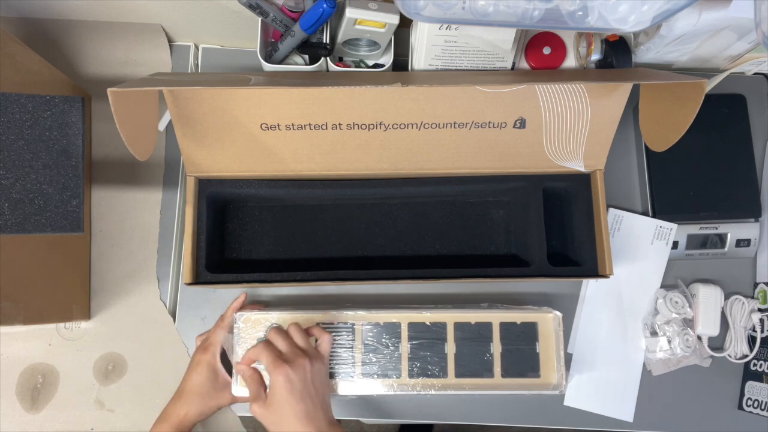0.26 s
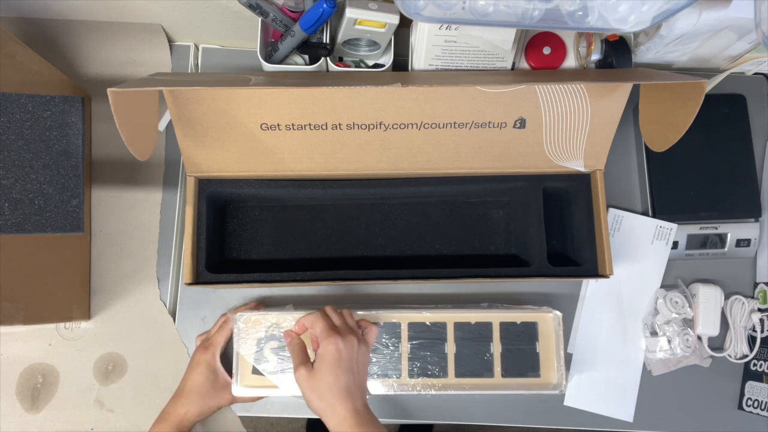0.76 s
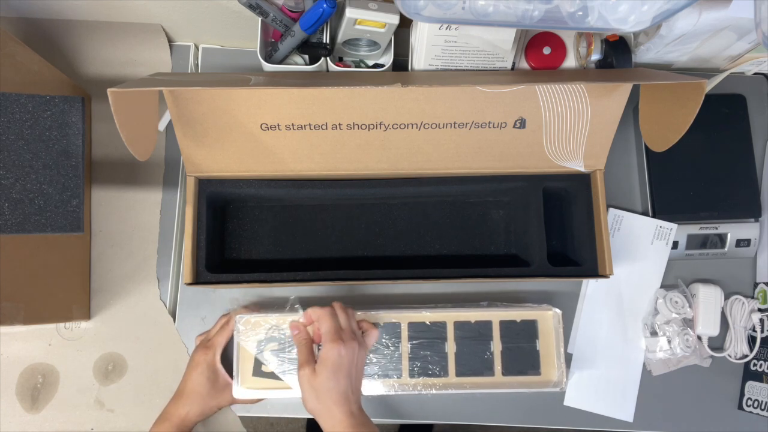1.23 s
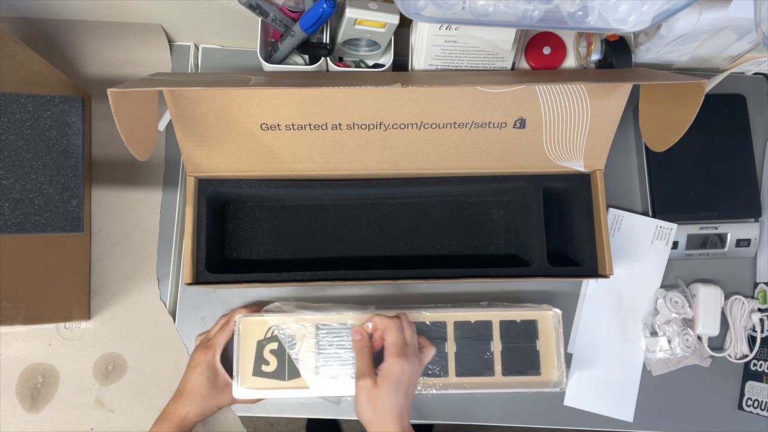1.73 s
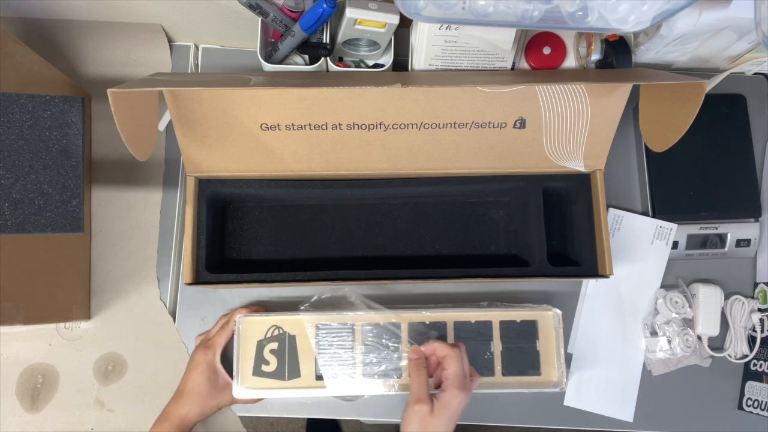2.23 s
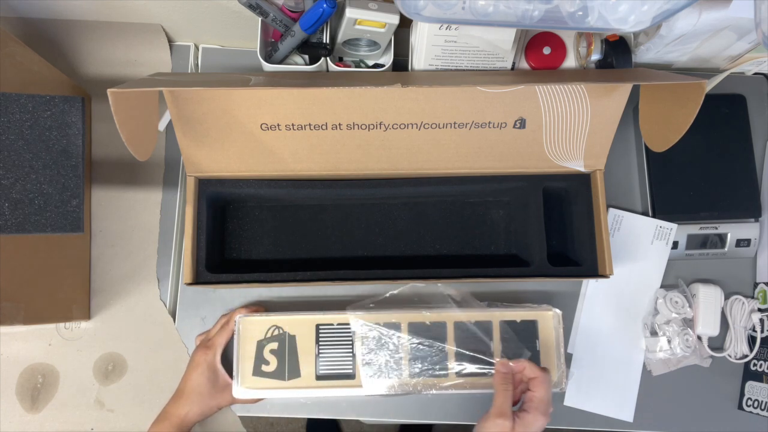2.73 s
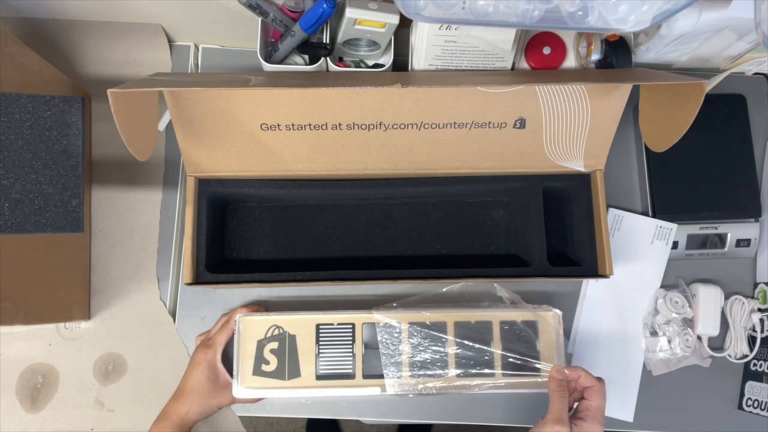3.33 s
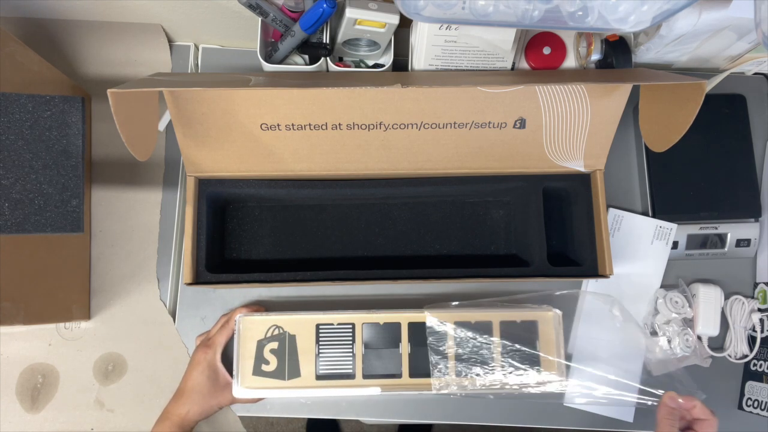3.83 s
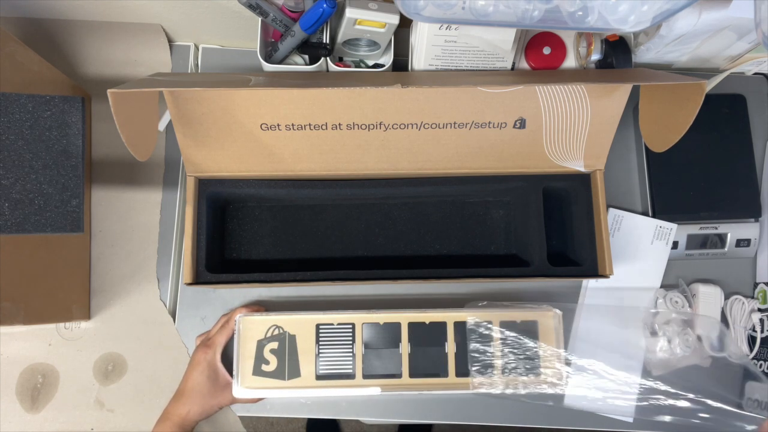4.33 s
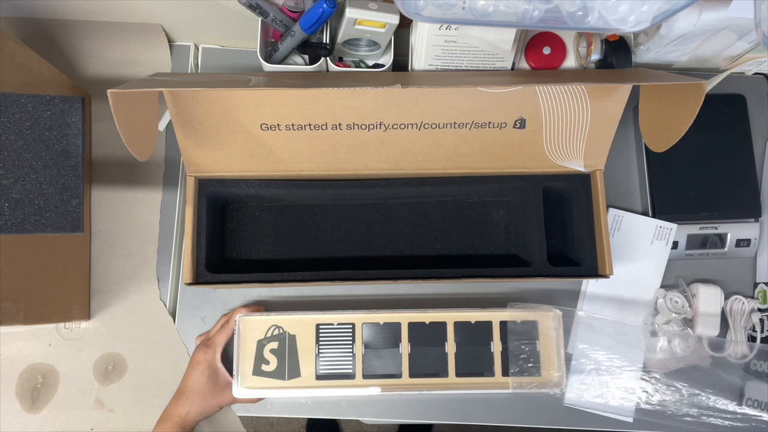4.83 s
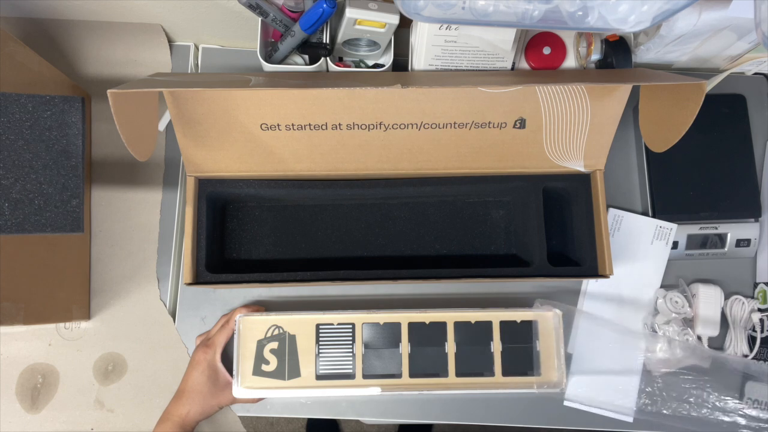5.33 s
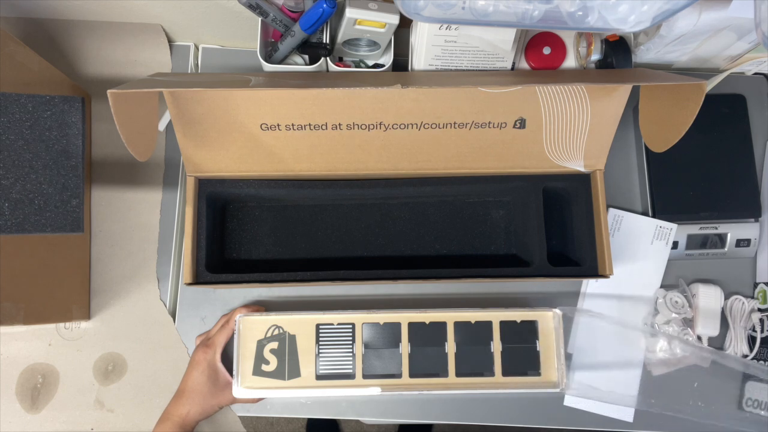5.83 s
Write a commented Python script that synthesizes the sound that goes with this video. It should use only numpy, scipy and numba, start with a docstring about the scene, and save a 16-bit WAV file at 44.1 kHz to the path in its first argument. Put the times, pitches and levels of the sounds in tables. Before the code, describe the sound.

A hand strips clinging plastic film from a rigid panel. First come faint, broken crackles, ticks and tiny pops, then gritty tearing rasps in separate tugs, a near-silent pause, and a sustained, loud, bright ripping hiss with a papery, hollow ring, ending in a sharp crinkle. The panel occasionally bumps the desk softly. Near microphone overhead, short room reflections, quiet low rumble throughout.

```python
"""Protective film pulled in tugs off a plastic panel on a desk, under an overhead two-port microphone in a small room.
A short tug with crinkles and pops opens on the left, then weak tugs to 1.2 s, firmer ones to 3 s and a brief lull.
From 3.3 s long hard pulls move right until a last crinkle near 6 s; soft desk knocks recur and the room hums throughout.
The glue lets go in tiny random snaps that ring the freed sheet, the panel, its rim and the hollow beneath.
The echo off an open carton sweeps with the peel line: its detour shrinks from about 2.5 m to 1.1 m by 1.5 s."""
import sys
import numpy as np
from scipy import signal
from scipy.fft import rfft, irfft
from scipy.io import wavfile
from scipy.ndimage import map_coordinates
from numba import njit

SR = 44100
rng = np.random.default_rng(int(sys.argv[2]) if len(sys.argv) > 2 else 0)


def materialize(psi):
    """Save the field psi as 16-bit PCM at rate SR to the path in sys.argv[1].

    A 1-D psi becomes a single channel; in a 2-D psi each row is a channel.
    """
    bounded = np.clip(np.atleast_2d(psi).T, -1, 1)
    quanta = np.round(bounded * 32767).astype(np.int16)
    wavfile.write(sys.argv[1], SR, quanta)


N = 267687
T = np.arange(N) / SR

# Tugs of the hand: (start [s], attack [s], end [s], relative pull [dB], sag while held [dB/s],
# relative ring of the freed sheet [dB])
HAND_TUGS = [(-0.045, 0.15, 0.21, -30, 47.5, -19), (0.24, 0.017, 0.3, -59, 65, -9),
             (0.456, 0.11, 0.66, -37, 1, -6.5), (0.689, 0.046, 0.98, -55.5, 24, -9),
             (0.927, 0.074, 1.203, -40.5, -7, -10), (1.171, 0.054, 1.287, -28, 16.5, -5.5),
             (1.32, 0.085, 1.53, -42, -5, -13), (1.389, 0.02, 1.57, -37.5, -12, -12),
             (1.437, 0.042, 1.698, -28, 15, -6), (1.678, 0.087, 2.09, -29.5, 30, -10),
             (1.999, 0.081, 2.425, -28.5, -3, -4.5), (2.296, 0.23, 2.83, -26.5, 9.5, -2.5),
             (2.66, 0.22, 3.057, -27, 16.5, -1), (3.245, 0.055, 3.45, -49.5, 2, -9),
             (3.345, 0.021, 3.645, -27, 2.5, 1.2), (3.492, 0.17, 5.4, -27.5, 2, -3),
             (4.601, 0.32, 5.04, -26.5, 46, -1.5), (5.061, 0.12, 5.54, -28.5, -1, 2),
             (5.305, .1, 6, -30, 6, 3.5), (5.617, 0.082, 5.85, -26, 26, 0.5),
             (5.935, 0.03, 5.97, -25, 21, 2.5)]
# Place of the peel line: (time [s], lead of the left port [ms], delay of the carton echo [ms])
PEEL_PATH = [(0, 0.11, 7.2), (1.5, 0.17, 3.1), (2.5, 0.073, 3.46), (3.3, 0.037, 2.9), (6.07, -0.069, 3.34)]
# Spectrum of one snap of the glue: (frequency [Hz], relative level [dB])
SNAP_SPECTRUM = [(100, -15), (250, -20), (400, -13), (700, -17.5), (1200, -8.5), (2200, -3.5), (3400, -3),
                 (4600, -2.5), (5800, -2), (7200, -1), (8500, -2), (10000, -1), (12000, -5), (16000, -8.5)]
# Resonances of the taut freed sheet: (frequency [Hz], width [Hz], relative level [dB])
SHEET_MODES = [(1346, 55, -7), (1533, 100, -0.5), (1759, 90, -0.5), (2030, 83, -6), (2237, 100, -3),
               (2466, 210, -3), (2810, 190, -3), (3255, 160, -1.5), (3720, 220, -5.5)]
# Resonances of the panel: (frequency [Hz], width [Hz], relative level [dB])
PANEL_MODES = [(669, 110, -5.5), (811, 99, -1.5), (966, 130, -3.5), (1065, 95, 0.5)]
# Resonances of the hollow under the panel: (frequency [Hz], width [Hz], relative level [dB])
HOLLOW_MODES = [(381, 66, -5.5), (528, 47, 1), (601, 52, -3)]
# Resonances of the panel's rim: (frequency [Hz], width [Hz], relative level [dB])
RIM_MODES = [(660, 200, -5), (1054, 135, 0.5), (1484, 170, -2.5), (2050, 92, -11), (2290, 93, 0)]
# The peel line near either end of the panel, where the rim rings: (time [s], reach [s], relative ring [dB])
PANEL_ENDS = [(0.15, 0.23, -7), (5.86, 0.26, -11)]
# Sharp crinkles of the film: (time [s], relative peak [dB], relative tap on the panel [dB])
FILM_CRINKLES = [(0.2226, -19, -2), (0.227, -18.5, 13), (0.3309, -42, -22), (0.4165, -42.5, -18),
                 (0.447, -31.5, -6), (0.4916, -40, -25), (0.709, -29, -11), (0.7586, -32, -22),
                 (0.783, -31, -23), (0.811, -31, -24), (0.8572, -30.5, -1), (0.8805, -35, -26),
                 (0.933, -25, -19), (0.946, -30, -12), (0.9568, -29, -13), (1.063, -24, -18),
                 (3.187, -33, -34), (3.357, -30, -10), (5.982, -14, 3)]
# Spectrum of a buckling crease: (frequency [Hz], relative level [dB])
CREASE_SPECTRUM = [(200, -37), (2000, -33), (5000, 4), (7000, 3), (10000, 3.5), (14000, 2), (16000, -1)]
# Lone pops of the glue as the pull slackens: (time [s], relative peak [dB])
GLUE_POPS = [(0.225, -16.5), (0.29, -30), (0.309, -36), (0.325, -32), (0.348, -35.5), (0.447, -24.5),
             (0.708, -31), (0.745, -34), (0.86, -38), (0.957, -30)]
# The hands nudge the panel against the desk: (time [s], peak [dB], hardness [dB/octave])
HAND_NUDGES = [(0.045, -29, 0), (0.121, -35, 1), (1.154, -43, -3), (1.248, -38.5, -2.5), (1.509, -37, -4),
               (2.621, -41, 1), (3.097, -43.5, 15), (5.944, -37.5, -1), (5.998, -42.5, 6)]
# Modes of the panel on the desk: (nominal frequency [Hz], relative level [dB], 60 dB decay time [s])
DESK_MODES = [(63.6, 0, 0.98), (84.5, 7.5, 0.41), (152, -0.5, 0.4), (219.7, 3.5, 0.27), (244, -6, 0.15)]
# Spectrum of the sound scattered around desk and room: (frequency [Hz], relative level [dB])
SCATTER_SPECTRUM = [(100, -7), (300, -1.5), (700, -2.5), (1500, -7.5), (2500, -2), (4000, 2.5), (6000, 3),
                    (8000, -5.5), (11000, -11.5), (16000, -27)]
# Spectrum of the room background: (frequency [Hz], relative level per Hz [dB])
ROOM_SPECTRUM = [(20, -22), (38, -27), (56, 3), (80, -3.5), (105, -6), (140, -15), (220, -11.5),
                 (320, -24.5), (500, -27.5), (1000, -45), (3000, -37.5), (16000, -36.5)]
# Steady tones of the room: (frequency [Hz], relative rms level [dB])
ROOM_TONES = [(57, -55), (450, -72.5)]

RELEASE_DB_PER_S = 309.5  # the rasp dies when the hand stops
BREAKAWAY_SHARE = 0.23  # the glue gives way at once with this share of a tug's strength
SLACK_DB = -69  # a slack film barely creeps
TREMOR_HZ, TREMOR_DB = 14, 0.5  # unsteadiness of the hand
SNAP_RATE_LAW, BRISK_DB = 1.2, -30  # the snap rate grows as this power of the pull, relative to a brisk one
# The freed sheet favours lower modes once the arm draws it out long
SHORT_SHEET_HZ, LONG_SHEET_HZ, DRAWN_OUT_S, DRAW_TIME_S = 2380, 1590, 3.26, 0.36
# Drive of the panel and of the hollow, with the extra each gets over the cavity
PANEL_DB, PANEL_CAVITY_DB = -15, 2
HOLLOW_DB, HOLLOW_CAVITY_DB = -22, 17.5
CAVITY_S, CAVITY_TIME_S = 5.41, 0.7
COUPLING_FADE_DB_PER_S = 2  # both are driven less as the peel line travels on
TAUT_PANEL_SHARE = 0.59  # a sheet that rings more also drives the panel harder, dB per dB


def peel(catch, pull_db, sheet_ring_db, brisk_snap_rate=6000, spread_db=2.5, rasp_db=-4, sheet_db=-5):
    """One half of the peel line: slack film ticks, hard pulls rasp; the snaps ring sheet, panel, rim and hollow."""
    panel_db = coupling(PANEL_DB, PANEL_CAVITY_DB) + TAUT_PANEL_SHARE * sheet_ring_db
    hollow_db = coupling(HOLLOW_DB, HOLLOW_CAVITY_DB)
    near_rim = sum(undb(db) * np.exp(-((T - s) / reach) ** 2) for s, reach, db in PANEL_ENDS)

    rate = brisk_snap_rate * undb(SNAP_RATE_LAW * (pull_db - BRISK_DB))
    force = snaps(rate, spread_db) * catch * undb(pull_db)

    rasp = undb(rasp_db) * through(force, response(SNAP_SPECTRUM))
    sheet = ring(force * undb(sheet_ring_db + sheet_db), SHEET_MODES, sheet_pitch(),
                 focus_db=6.0, wander_db=1.94, drift=0.013)
    panel = ring(force * undb(panel_db), PANEL_MODES, wander_db=3.0, drift=0.022)
    rim = ring(force * near_rim, RIM_MODES, wander_db=1.5, drift=0.023)
    hollow = ring(force * undb(hollow_db), HOLLOW_MODES, wander_db=2.5, drift=0.011)
    return rasp + sheet + panel + rim + hollow


def tugs():
    """Each tug builds, sags or grows while held and dies; the strongest sets the pull. Returns pull and sheet ring, dB."""
    pulls = []
    for start, attack, end, db, sag, _ in HAND_TUGS:
        held = np.maximum(np.minimum(T, end) - start - attack, 0)
        fall_db = sag * held + RELEASE_DB_PER_S * np.maximum(T - end, 0)
        rise = (T > start) * np.interp(T, [start, start + attack], [BREAKAWAY_SHARE, 1])
        pulls.append(rise * undb(db - fall_db))
    pulls = np.array(pulls) + undb(SLACK_DB)
    pull_db = 20 * np.log10(pulls.max(axis=0)) + TREMOR_DB * walk(TREMOR_HZ)
    # the sheet's ring is an average over the tugs, weighted by their power
    power = pulls ** 2
    sheet_ring_db = np.array(HAND_TUGS)[:, -1] @ power / np.sum(power, axis=0)
    return pull_db, sheet_ring_db


def slips(rate=260, decay_s=0.001, depth=0.18, spread_db=4.5):
    """Stick and slip: each jump of the peel line raises the force of the snaps for about a millisecond; rms 1."""
    size = undb(spread_db * np.minimum(rng.exponential(size=N), 3))
    jumps = (rng.random(N) < rate / SR) * size
    avalanche = signal.lfilter([1], [1, -np.exp(-1 / (decay_s * SR))], jumps)
    return unit(1 + depth * avalanche)


def snaps(rate, spread_db):
    """Tiny releases of the glue at random moments, rate a second within limits, of very uneven size; rms 1."""
    chance = np.clip(rate / SR, 1e-4, 1)
    size = undb(spread_db * np.minimum(rng.exponential(size=N), 5))
    hits = (rng.random(N) < chance) * size * rng.choice([-1, 1], N)
    return unit(hits / np.sqrt(chance))  # more snaps do not mean more power here


def sheet_pitch():
    """The pitch that the freed sheet favours, in Hz: it sinks as the sheet grows long."""
    drawn = (1 + np.tanh((T - DRAWN_OUT_S) / DRAW_TIME_S)) / 2
    return SHORT_SHEET_HZ + (LONG_SHEET_HZ - SHORT_SHEET_HZ) * drawn


def coupling(base_db, cavity_db):
    """How hard the peel line drives a part, in dB: it fades along the panel, with a peak over the cavity."""
    over_cavity = np.exp(-((T - CAVITY_S) / CAVITY_TIME_S) ** 2)
    return base_db - COUPLING_FADE_DB_PER_S * T + cavity_db * over_cavity


def ring(force, modes, favoured_hz=1, focus_db=0, wander_db=1.5, drift=0):
    """Each snap pushes a mode up or down at random; couplings and pitches drift as the peel line moves."""
    out = np.zeros(N)
    for hz, width, db in modes:
        # focus_db is lost per octave away from the favoured pitch
        coupling_db = db - focus_db * np.abs(np.log2(hz / favoured_hz)) + wander_db * walk(9)
        drive = force * rng.choice([-1, 1], N) * undb(coupling_db)
        moving_hz = hz * (1 + drift * walk(4))
        tone = bandpass(drive, moving_hz, float(width)) * np.sqrt(SR / np.pi / width)
        out += signal.lfilter(*signal.iirpeak(hz, 1, SR), tone)  # a mode radiates little far from its own pitch
    return out / np.linalg.norm(undb([db for _, _, db in modes]))


@njit
def bandpass(x, hz, width):
    """State-variable band-pass with a moving centre, gain 1 there."""
    y, band, low = np.empty(len(x)), 0., 0.
    for i in range(len(x)):
        g, damping = np.tan(np.pi * hz[i] / SR), width / hz[i]
        v = (band + g * (x[i] + 1e-18 - low)) / (1 + g * (g + damping))
        band, low, y[i] = 2 * v - band, low + 2 * g * v, damping * v
    return y


def crinkles(gain_db=1, size=4096):
    """A crease buckles: a bright burst of about a millisecond that also cracks the glue and taps the panel."""
    out = np.zeros(N)
    crease = response(CREASE_SPECTRUM)
    tap = response(SNAP_SPECTRUM) + resonator(PANEL_MODES) / 2
    for s, db, tap_db in FILM_CRINKLES:
        burst = rng.standard_normal(size) * np.exp(-T[:size] / 0.0011)
        tick = signal.fftconvolve(burst, crease + undb(tap_db) * tap)
        add(out, s, tick * undb(db + gain_db) / np.abs(tick).max())
    return out


def pops(low_hz=700, soft_hz=1500, crack_db=-6):
    """A last spot of glue lets go softly under the slackening film and rings the panel's rim."""
    soften = signal.butter(1, [low_hz, soft_hz], "band", fs=SR, output="sos")
    rim = signal.sosfilt(soften, resonator(RIM_MODES))
    pop = rim + undb(crack_db) * response(SNAP_SPECTRUM)
    out = np.zeros(N)
    for s, db in GLUE_POPS:
        add(out, s, pop * undb(db) / np.abs(pop).max())
    return out


def place(x, offset_ms, carton_db=-12, desk_db=-21, desk_ms=4.1, direct_db=-2, wet_db=7.0):
    """The peel line as the microphone gets it: direct, off the carton, off the desk, and from the room."""
    lead_ms, echo_ms = curves(PEEL_PATH)
    near = x + undb(carton_db) * delay(x, echo_ms) + undb(desk_db) * delay(x, desk_ms)
    return undb(direct_db) * ports(near, lead_ms + offset_ms) + undb(wet_db) * room(x)


def ports(x, lead_ms, split_hz=4600, treble_lag_ms=0.1956):
    """Two microphone ports: the lag follows the source, but in the treble the housing keeps the left a little late."""
    low = signal.sosfiltfilt(signal.butter(6, split_hz, fs=SR, output="sos"), x)
    high = x - low
    left = delay(low, -lead_ms / 2) + delay(high, treble_lag_ms / 2)
    right = delay(low, lead_ms / 2) + delay(high, -treble_lag_ms / 2)
    return np.array([left, right])


def room(x, t60_s=0.18, clutter_s=0.0073, clutter_db=-4.0, tail_db=-13.0, count=26, size=8192):
    """Quick scatter off the things on the desk, new at each place of the peel line, then the room's short tail."""
    t = T[:size]
    x = through(x, response(SCATTER_SPECTRUM)) / 2
    out, step = np.zeros((2, N)), T / T[-1] * (count - 1)
    for k in range(count):
        # neighbouring places cross-fade
        here = np.abs(step - k) < 1
        piece = x[here] * np.cos(np.pi / 2 * (step[here] - k))
        for port in out:
            clutter = rng.standard_normal(size) * np.exp(-t / clutter_s) * (t > 0.0005)
            tail = rng.standard_normal(size) * np.exp(-np.log(1000) * t / t60_s) * (t > 0.007)
            echoes = undb(clutter_db) * clutter / np.linalg.norm(clutter)
            echoes += undb(tail_db) * tail / np.linalg.norm(tail)
            add(port, T[here][0], signal.fftconvolve(piece, echoes))
    return out


def nudges(size=16384):
    """Soft, low knocks of the panel on the desk; a harder contact favours the upper modes."""
    out, t = np.zeros(N), T[:size]
    for s, db, hardness in HAND_NUDGES:
        knock = np.zeros(size)
        for hz, mode_db, t60 in DESK_MODES:
            # each knock detunes the modes a little
            phase = 2 * np.pi * hz * (1 + 0.016 * rng.standard_normal()) * t
            gain = undb(mode_db + hardness * np.log2(hz))
            knock += gain * np.sin(phase) * np.exp(-np.log(1000) * t / t60)
        add(out, s, knock * undb(db) / np.abs(knock).max())
    return out


def background(rumble_db=-53.5, side_db=-13, left_db=-3.0):
    """Low rumble, as of a fan, with two wavering tones, nearly the same at both ports but softer at the left."""
    mid, side = (through(rng.standard_normal(N), response(ROOM_SPECTRUM)) * undb(rumble_db) for _ in range(2))
    for hz, db in ROOM_TONES:
        wavering_phase = 2 * np.pi * hz * T + 1.43 * walk(7.5)
        mid = mid + undb(db) * unit(np.sin(wavering_phase))
    side = side * undb(side_db)
    return np.array([(mid + side) * undb(left_db), mid - side])


def undb(db):
    """Decibels to gain."""
    return 10 ** (np.asarray(db) / 20)


def unit(x):
    """Scale to rms 1."""
    return x / np.sqrt(np.mean(x ** 2))


def curves(table):
    """The columns of a timed table, one value per sample."""
    s, *columns = np.transpose(table)
    return [np.interp(T, s, c) for c in columns]


def walk(rate):
    """Smooth chance of rms 1: random points, rate a second, joined by straight lines."""
    points = rng.standard_normal(N // 20)
    return unit(np.interp(T * rate, np.arange(len(points)), points))


def response(points, size=4096):
    """Causal minimum-phase impulse response, of energy 1, with the shape of a (Hz, dB) spectrum."""
    hz, db = np.transpose(points)
    f = np.maximum(np.fft.rfftfreq(size, 1 / SR), 1)
    cepstrum = irfft(np.log(undb(np.interp(np.log(f), np.log(hz), db))))
    # fold the cepstrum onto positive time
    cepstrum[1:size // 2] *= 2
    cepstrum[size // 2 + 1:] = 0
    h = irfft(np.exp(rfft(cepstrum)))
    return h / np.linalg.norm(h)


def resonator(modes, size=4096):
    """Impulse response, of energy 1, of (Hz, width, dB) resonances: a sum of decaying sines."""
    t = T[:size]
    h = np.zeros(size)
    for hz, width, db in modes:
        h += undb(db) * width * np.exp(-np.pi * width * t) * np.sin(2 * np.pi * hz * t)
    return h / np.linalg.norm(h)


def through(x, h):
    """Play a sound through an impulse response."""
    return signal.oaconvolve(x, h)[:N]


def delay(x, ms):
    """Delay by a steady or moving time."""
    return map_coordinates(x, [(T - ms / 1000) * SR], order=3)


def add(out, s, sound):
    """Mix a sound in at time s."""
    i = int(s * SR)
    out[i:i + len(sound)] += sound[:N - i]


def scene(judder_hz=55, judder_db=0.76, width_ms=0.0088):
    """The two halves of the peel line catch together but snap on their own; the hands knock and the room hums."""
    catch = slips() * undb(judder_db * walk(judder_hz))
    pull_db, sheet_ring_db = tugs()
    left_half = peel(catch, pull_db, sheet_ring_db) + crinkles() + pops()
    right_half = peel(catch, pull_db, sheet_ring_db)
    film = place(left_half, width_ms) + place(right_half, -width_ms)
    return film + nudges() + background()


def record(dry, bass_hz=42, top_hz=15900):
    """The microphone loses the deepest bass; the recorder cuts the top."""
    sound = signal.sosfilt(signal.butter(4, bass_hz, "high", fs=SR, output="sos"), dry)
    return signal.sosfilt(signal.ellip(10, 0.1, 80, top_hz, fs=SR, output="sos"), sound)


dry = scene()
out = record(dry)
materialize(out)
```